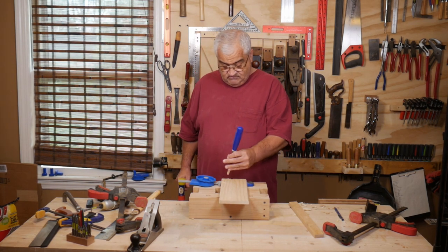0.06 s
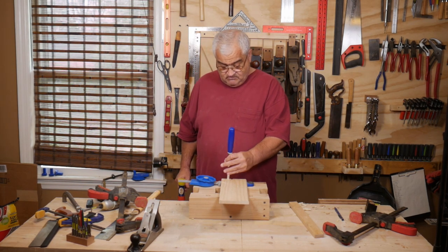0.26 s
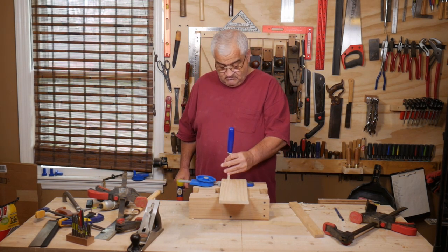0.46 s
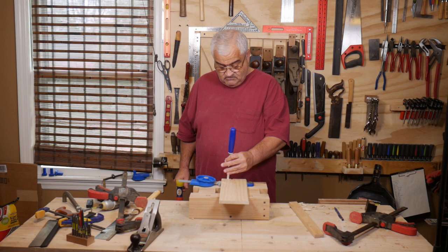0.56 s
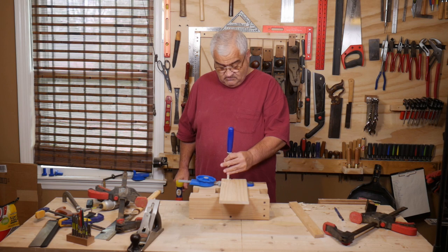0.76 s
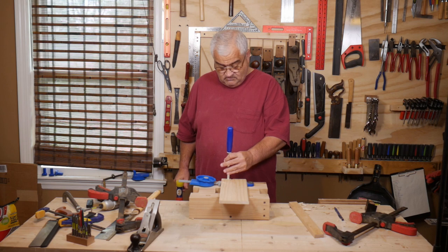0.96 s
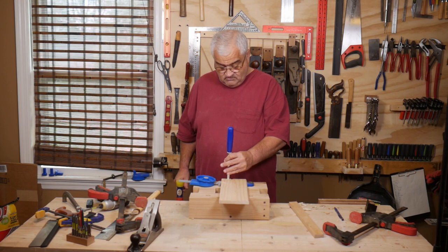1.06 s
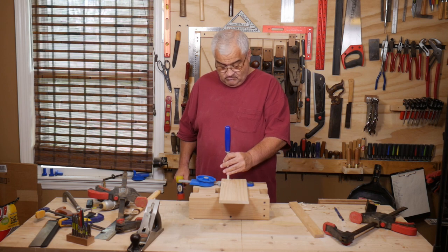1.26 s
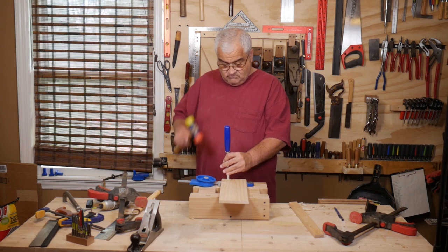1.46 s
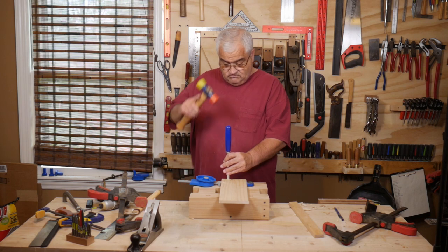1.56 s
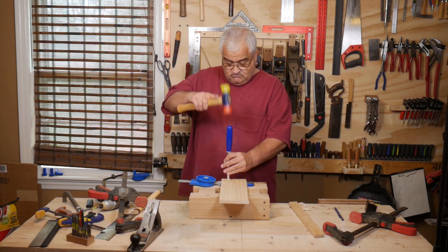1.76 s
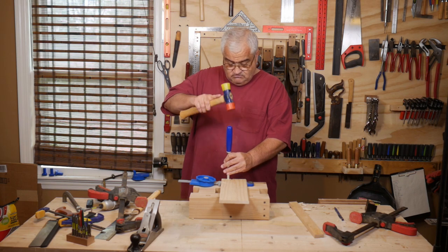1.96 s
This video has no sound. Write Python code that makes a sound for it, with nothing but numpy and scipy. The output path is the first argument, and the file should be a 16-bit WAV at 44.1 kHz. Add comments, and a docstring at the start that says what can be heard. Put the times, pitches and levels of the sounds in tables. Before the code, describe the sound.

A chisel is set on a wooden board with soft thuds, ticks and small scuffs, a thin snap sounding further off; then one mallet blow cracks out, overloading the microphone in a small, live workshop.

```python
"""Chisel taps and a mallet blow

A chisel is set on a board clamped to a hollow bench in a small workshop: light taps and edge scuffs, a thin
bright snap further off, then one mallet blow that overloads the recorder. An earlier knock is still dying away.
Impulses ring tuned modes for board, blade, bench and mallet; smeared noise bursts make snap and crack;
decaying noise bands make the room, and coloured noise makes the faint hiss and rumble of room and recorder.
"""
import sys
import numpy as np
from scipy import signal
from scipy.fft import rfft, irfft
from scipy.io import wavfile

SR = 44100
rng = np.random.default_rng(int(sys.argv[2]) if len(sys.argv) > 2 else 0)


def inscribe(sig):
    """Save sig as 16-bit PCM at rate SR to the path in sys.argv[1].

    A 1-D sig is mono; a 2-D sig holds one channel per row.
    Samples are clipped to [-1, 1] before scaling.
    """
    pcm = np.round(np.clip(np.atleast_2d(sig).T, -1, 1) * 32767)
    wavfile.write(sys.argv[1], SR, pcm.astype(np.int16))


N = 88200
LEAD = 4410   # samples of run-in, trimmed off in scene()


def amp(db):
    """Turn decibels into a gain factor."""
    return 10 ** (np.asarray(db) / 20)


def at_hz(points, hz):
    """Read a curve of (f/Hz, value) points, straight between points on a log-frequency axis."""
    points = np.array(points)
    return np.interp(np.log(np.maximum(hz, 1)), np.log(points[:, 0]), points[:, 1])


def octaves(modes):
    """Distance of each mode from 500 Hz, in octaves."""
    return np.log2(np.array(modes)[:, 0] / 500)


def coloured(spectrum, size):
    """Noise of the given spectrum, rms 1."""
    gain = amp(at_hz(spectrum, np.fft.rfftfreq(size, 1 / SR)))
    noise = irfft(rfft(rng.standard_normal(size)) * gain, size)
    return noise / noise.std()


def clicks(times, db):
    """Impulses at the given times, over a negligible constant offset."""
    out = np.full(N + LEAD, 1e-18)
    np.add.at(out, (np.asarray(times) * SR).astype(int) + LEAD, amp(db))
    return out


def ring(force, hz, t60):
    """One mode: a two-pole resonator in which a unit impulse rings with height 1."""
    radius = amp(-60 / (t60 * SR))
    angle = 2 * np.pi * hz / SR
    return signal.lfilter([0, np.sin(angle)], [1, -2 * radius * np.cos(angle), radius * radius], force)


def strike(modes, times, db, step=1):
    """Impulses ring a table of modes; each mode is scaled by step over the last, so a negative step flips phase."""
    db = np.zeros((len(times), len(modes))) + db   # one strength per blow and mode
    out = 0
    for k, (hz, level_db, t60) in enumerate(modes):
        out = out + step ** k * ring(clicks(times, db[:, k] + level_db), hz, t60)
    return out


def burst(start_s, db, length_s, spectrum):
    """A short crackle: a fixed spectrum whose narrow bands each arrive with their own random delay."""
    size = N + LEAD
    hz = np.fft.rfftfreq(size, 1 / SR)
    spread = np.interp(hz, np.linspace(0, SR / 2, 60), rng.exponential(1, 60))
    delay_s = start_s + LEAD / SR + length_s / 2 * spread
    phase = 2 * np.pi * np.cumsum(delay_s) * SR / size   # delay summed over frequency gives phase
    crackle = irfft(amp(at_hz(spectrum, hz)) * np.exp(-1j * phase), size)
    return amp(db) * crackle * np.sqrt(length_s * SR / 2 / np.sum(crackle ** 2))


# Spectrum of the hiss and rumble bed: f/Hz, relative level/dB
FLOOR_SPECTRUM = [(12, -17), (20, -2), (59, -0.5), (187, -8.5), (221, -7), (300, -9.5), (510, -10.5),
                  (655, -12), (775, -13), (1210, -16.5), (15800, -21.5)]
# Stereo width of the bed: f/Hz, side-minus-mid level/dB
FLOOR_WIDTH = [(60, -23.5), (400, -17.5), (1000, -17.5), (4400, -15), (14000, -11.5)]
FLOOR_DB = -53   # rms of the mid channel


def floor():
    """Steady coloured noise for hiss and rumble, nearly the same on both sides."""
    mid, side = coloured(FLOOR_SPECTRUM, N), coloured(FLOOR_SPECTRUM, N)
    width = amp(at_hz(FLOOR_WIDTH, np.fft.rfftfreq(N, 1 / SR)))
    side = irfft(rfft(side) * width, N)
    return amp(FLOOR_DB) * (mid + side * [[1], [-1]])


# Modes of the earlier knock: f/Hz, level/dB, t60/s
KNOCK_MODES = [(225.5, -42.5, 0.17), (381.5, -39, 0.36), (388.4, -36.5, 0.36), (544, -43, 0.17),
               (716, -41.5, 0.2), (958, -54, 0.25), (1560, -62, 0.94)]
# Spectrum of its noise burst: f/Hz, relative level/dB per Hz
KNOCK_HISS = [(200, 2), (1000, -7), (3000, -3), (7000, -9), (15000, -35)]
KNOCK_AGO_S, KNOCK_HISS_DB, KNOCK_HISS_LENGTH_S = 0.03, -24.5, 0.0049


def earlier_knock():
    """Something set down on the bench just before the start: modes ring on after a short burst."""
    tone = strike(KNOCK_MODES, [-KNOCK_AGO_S], 0)
    return tone + burst(-KNOCK_AGO_S, KNOCK_HISS_DB, KNOCK_HISS_LENGTH_S, KNOCK_HISS)


# Room decay: f/Hz, t60/s
ROOM_T60 = [(60, 0.65), (250, 0.49), (1000, 0.37), (4000, 0.33), (8000, 0.39), (15000, 0.33)]
# Room tone colour: f/Hz, relative level/dB
ROOM_COLOUR = [(60, 0.5), (250, 1), (1000, 1), (4000, -5), (8000, -2.5), (15000, -9)]
# Stereo width of the room tail, before the brief onset widening: f/Hz, side-minus-mid level/dB
ROOM_WIDTH = [(60, -55), (300, -76), (1000, -69), (3000, -43), (8000, -42), (14000, -21)]
ROOM_DB, ROOM_BUILD_S = -4.5, 0.0063
ONSET_WIDENING_DB, ONSET_WIDENING_DECAY_S = 36, 0.0016


def room(source):
    """Half-octave noise bands die as dense reflections; each onset has a brief, faint left-right difference."""
    t = np.arange(SR) / SR
    edges = 30 * 2 ** np.arange(0, 9.6, .5)
    white = rng.standard_normal((2, 2, SR))   # two mid/side pairs, alternating between bands
    build = 1 - np.exp(-(t / ROOM_BUILD_S) ** 2)
    widening = amp(ONSET_WIDENING_DB) * np.exp(-t / ONSET_WIDENING_DECAY_S)
    onset = np.array([build, build + widening])
    response = 0
    for k, (low, high) in enumerate(zip(edges, edges[1:])):
        hz = np.sqrt(low * high)
        t60 = at_hz(ROOM_T60, hz)
        band = signal.sosfilt(signal.butter(2, [low, high], "band", fs=SR, output="sos"), white[k % 2])
        level_db = at_hz(ROOM_COLOUR, hz) + np.array([[0], [at_hz(ROOM_WIDTH, hz)]])
        decay = amp(level_db - 60 * t / t60)
        response = response + band * decay / np.sqrt(t60 * SR / 14)   # offsets the energy of longer tails
    wet = signal.fftconvolve(source[None], response * onset, axes=1)
    mid, side = wet[:, :len(source)]
    return amp(ROOM_DB) * (mid + side * [[1], [-1]])


# Chisel touches, drive into each part: t/s, board thud level/dB, edge tick level/dB,
# thud brightness tilt/(dB per octave), bench boom level/dB
TOUCHES = [(0.367, -23.5, -41, 3, -40.5), (0.393, -27, -51.5, -12, -48.5), (0.401, -33, -71, 0, -39),
           (0.72, -27.5, -44, -6, -37.5), (0.745, -52, -47.5, -10, -42), (0.754, -36, -55.5, -17, -40.5),
           (0.885, -51, -51, -3, -61), (0.937, -36.5, -43.5, 8, -55), (0.943, -40.5, -55, 7, -50.5),
           (1.001, -45, -49.5, 12, -52.5), (1.015, -39.5, -55.5, 10, -53), (1.029, -34.5, -50.5, 5, -51.5),
           (1.064, -47, -64, -16, -60), (1.254, -38, -46.5, 19, -58), (1.265, -35, -49, 7, -51.5),
           (1.275, -43.5, -45, -13, -53), (1.283, -49, -45.5, 11, -54), (1.289, -31.5, -43, -9, -57),
           (1.296, -30, -46.5, 7, -50.5), (1.327, -40, -61, -3, -43.5)]
# Board modes: f/Hz, relative level/dB, t60/s
BOARD_MODES = [(278, -18, 0.075), (356, -17.5, 0.059), (411, -15.5, 0.11), (439, -21, 0.075),
               (473.6, -7, 0.13), (512.4, -23, 0.063), (637, -27.5, 0.069), (672, -19, 0.056),
               (717, -18.5, 0.083), (761, -19.5, 0.065), (1070, -21, 0.033)]
# Chisel blade and handle modes: f/Hz, relative level/dB, t60/s
CHISEL_MODES = [(1550, -10.5, 0.0093), (1867, -6, 0.039), (2227, -4, 0.0091), (2950, -3, 0.011),
                (3268, -5.5, 0.014), (3645, 3, 0.0047), (4103, 4.5, 0.008), (4480, 3.5, 0.0083),
                (5210, 0, 0.0063), (6070, -2, 0.0034), (8240, -4.5, 0.002), (11250, -14, .003),
                (13700, -17, 0.0051)]
THUD_BAND_HZ, TICK_BAND_HZ = [324, 787], [1610, 6700]
THUD_SCATTER_DB = 4   # random spread of each mode on each touch
SCUFF_DECAY_S, CLICK_DB = 0.0085, -4.5   # click level is relative to the touch's tick drive


def taps():
    """Each touch thuds softly in the board; a clean click and a decaying noise scuff ring the chisel."""
    times, thud_db, tick_db, tilt_db, _ = np.transpose(TOUCHES)
    scatter_db = THUD_SCATTER_DB * rng.standard_normal((len(times), len(BOARD_MODES)))
    mode_db = thud_db[:, None] + tilt_db[:, None] * octaves(BOARD_MODES) + scatter_db
    thud = strike(BOARD_MODES, times, mode_db)
    thud = signal.sosfilt(signal.butter(2, THUD_BAND_HZ, "band", fs=SR, output="sos"), thud)

    r = np.exp(-1 / (SCUFF_DECAY_S * SR))
    envelope = signal.lfilter([np.sqrt(1 - r * r)], [1, -r], clicks(times, tick_db))
    scuff = envelope * rng.standard_normal(N + LEAD)
    force = scuff + clicks(times, tick_db + CLICK_DB)
    tick = sum(amp(db - 1.5) * ring(force, hz, t60) for hz, db, t60 in CHISEL_MODES)
    return thud + signal.lfilter(*signal.butter(2, TICK_BAND_HZ, "band", fs=SR), tick)


# Hollow bench modes, close pairs that swell and beat: f/Hz, relative level/dB, t60/s
BENCH_MODES = [(64.8, 1, 0.26), (74.4, 0, 0.16), (103, -4.5, 0.22), (113.3, -6, 0.23), (170.8, 5, 0.093),
               (178.5, 5.5, 0.24)]


def bench_boom():
    """Each touch booms in the hollow bench, neighbouring modes starting in opposite phase."""
    times, _, _, _, boom_db = np.transpose(TOUCHES)
    return strike(BENCH_MODES, times, boom_db[:, None], -1)


SNAP_S, SNAP_DB, SNAP_LENGTH_S = 0.488, -19, 0.0064
# Snap spectrum: f/Hz, relative level/dB per Hz
SNAP_SPECTRUM = [(1000, -40), (1400, -32), (1900, 0), (2400, 1), (3300, -5), (4400, 0), (5300, 1),
                 (6400, -1.5), (9000, -9.5), (12000, -9), (15500, -21)]


def snap():
    """A thin bright burst, its frequency bands scattered over a few milliseconds."""
    return burst(SNAP_S, SNAP_DB, SNAP_LENGTH_S, SNAP_SPECTRUM)


NUDGE_S, NUDGE_DB = 0.57, -47


def bench_nudge():
    """A soft push sets the bench top humming in its two highest modes, in opposite phase."""
    return strike(BENCH_MODES[4:], [NUDGE_S], NUDGE_DB, -1.02)


# Mallet blow as its face lands, drives and seats, drive into each part: t/s, board level/dB,
# chisel level/dB, bench level/dB, mallet head level/dB
BLOW_CONTACTS = [(1.943, -40, -15.5, -57, -46), (1.9437, -19.5, -7, -55, -18.5),
                 (1.9445, -17, -0.5, -55, -25), (1.9458, -23, -9.5, -24, -3)]
# Mallet head modes: f/Hz, relative level/dB, t60/s
MALLET_MODES = [(485, -14, .3), (538, -1, 0.032), (542, -24, 0.28), (646, -6.5, 0.027), (1064, -12.5, .02),
                (1650, -14, 0.027)]
# Spectrum of the fibres splitting under the edge: f/Hz, relative level/dB per Hz
CRACK_SPECTRUM = [(800, -29), (2000, 0), (5000, 1), (9000, -10.5), (15000, -16)]
CRACK_S, CRACK_DB, CRACK_LENGTH_S = 1.9443, -7, 0.0015
BLOW_TILT_DB_OCT = 4


def blow():
    """The mallet drives board, bench and chisel modes far harder; its head knocks and the wood cracks."""
    times, board_db, chisel_db, bench_db, mallet_db = np.transpose(BLOW_CONTACTS)[:, :, None]
    times = times[:, 0]
    board = strike(BOARD_MODES, times, board_db + BLOW_TILT_DB_OCT * octaves(BOARD_MODES))
    chisel = strike(CHISEL_MODES, times, chisel_db, -0.99)
    mallet = strike(MALLET_MODES, times, mallet_db)
    bench = strike(BENCH_MODES, times, bench_db, -0.82)
    crack = burst(CRACK_S, CRACK_DB, CRACK_LENGTH_S, CRACK_SPECTRUM)
    return board + chisel + mallet + bench + crack


RUMBLE_CUT_HZ = 83
SNAP_DIRECT_DB, BOOM_TO_ROOM_DB = -14, -3.5   # the far snap is heard mostly through the room


def scene():
    """Mix the direct sounds with their room reflections, trim the run-in and lay the floor beneath."""
    near = earlier_knock() + taps() + blow()
    near = signal.lfilter(*signal.butter(2, RUMBLE_CUT_HZ, "high", fs=SR), near)
    boom = bench_boom() + bench_nudge()
    far = snap()
    direct = near + boom + amp(SNAP_DIRECT_DB) * far
    reflected = room(near + far + amp(BOOM_TO_ROOM_DB) * boom)
    return (direct + reflected)[:, LEAD:] + floor()


CLIP, CUTOFF_HZ = 0.94, 15850   # clip level in full-scale units


def record(dry):
    """The input clips hard, then a steep low-pass cuts the top."""
    clipped = np.clip(dry, -CLIP, CLIP)
    return signal.sosfilt(signal.ellip(10, .5, 70, CUTOFF_HZ, fs=SR, output="sos"), clipped)


dry = scene()
out = record(dry)
inscribe(out)
```